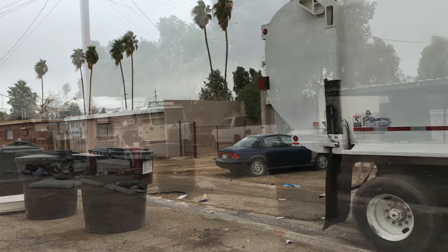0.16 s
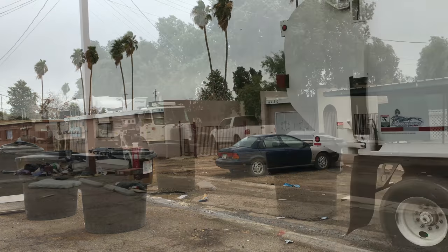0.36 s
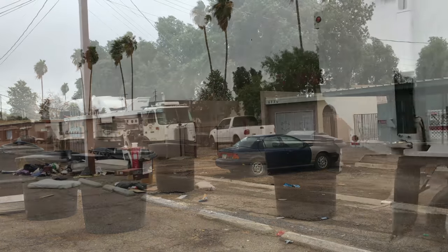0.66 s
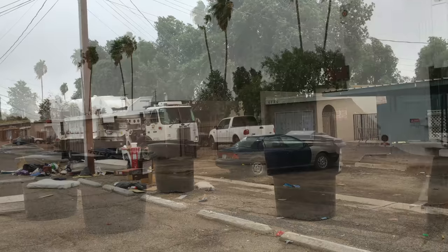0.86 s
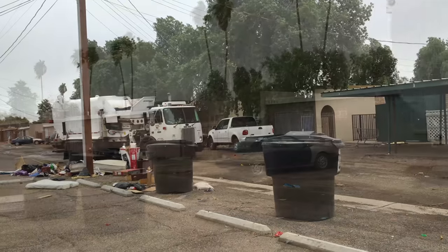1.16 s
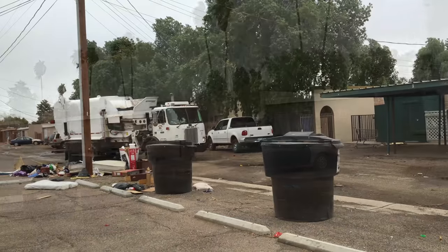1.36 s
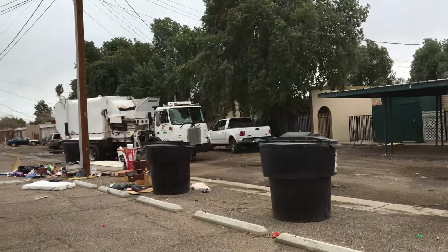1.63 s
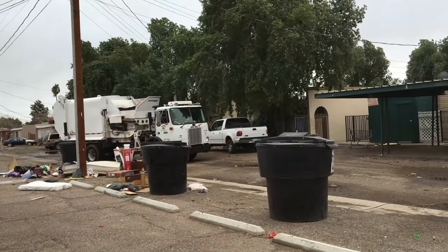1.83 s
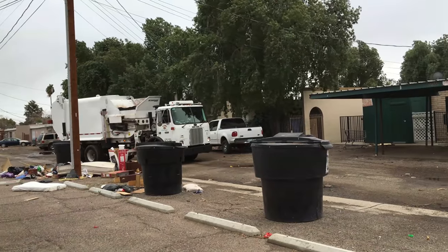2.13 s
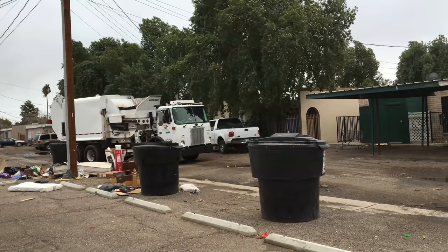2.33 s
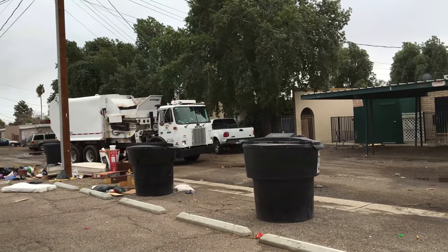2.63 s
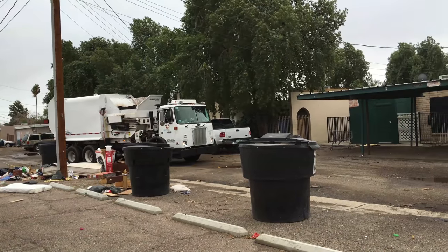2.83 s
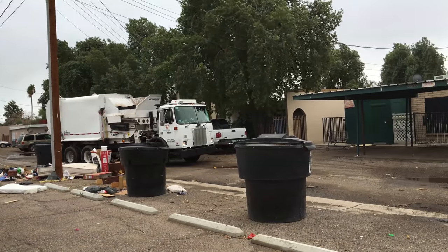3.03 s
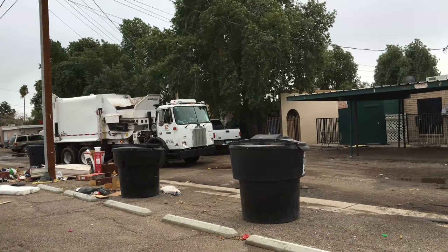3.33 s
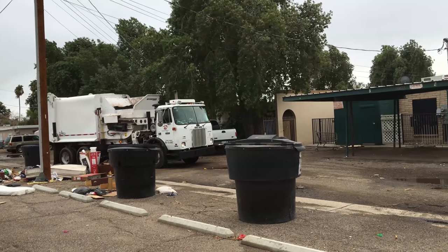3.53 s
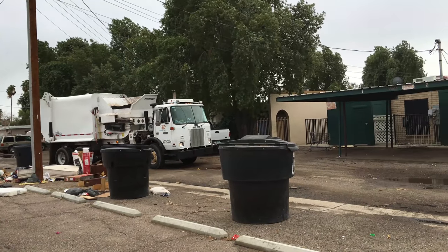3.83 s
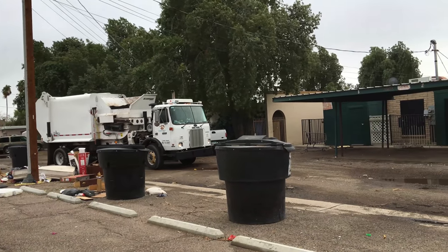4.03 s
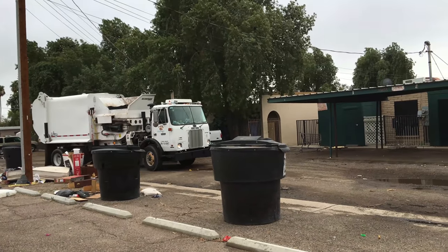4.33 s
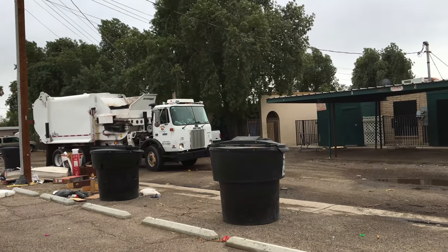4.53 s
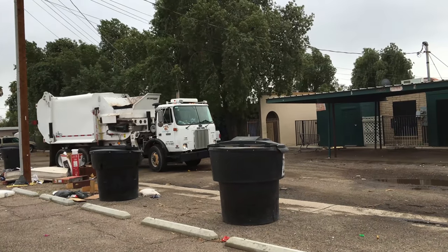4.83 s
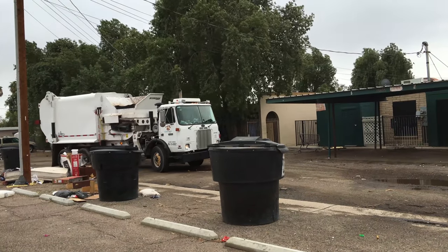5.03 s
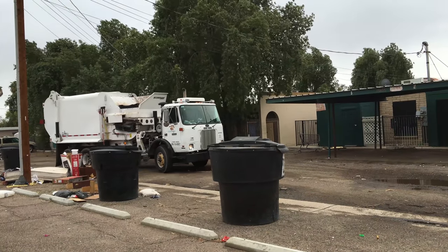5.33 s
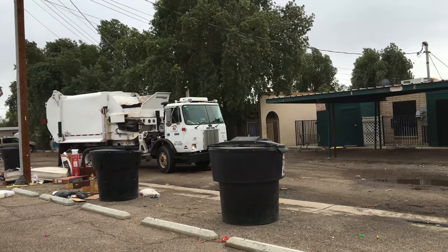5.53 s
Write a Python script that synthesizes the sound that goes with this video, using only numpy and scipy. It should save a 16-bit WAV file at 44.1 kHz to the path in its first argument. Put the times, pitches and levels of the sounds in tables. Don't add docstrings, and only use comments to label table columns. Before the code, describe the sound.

At 0 s a diesel refuse truck is close, with a strong low throb, rough clatter, whining gears and pumps, and a thin high brake squeak. Its revs and gear whine climb from about 0.4 s, and the exhaust fades by 1 s. From about 0.7 s gusty wind buffets a small bare microphone with irregular deep thumps, flapping slaps and fine crackle, heavy until about 3.4 s and sometimes overloading. Beneath it a second diesel across the open lot grows slowly, with faint whines, very high squeaks and tiny air puffs. From 3.43 to 4.14 s a loud, piercing, flickering brake squeal rings, sagging in pitch and ending in stutters. The wind slaps hard again from 4.1 to 4.5 s, then comes in sparser gusts. The far engine idles with buzzing panels; a sharp air puff comes at 5.47 s, and a last deep wind shove at 5.6 s.

```python
import sys
import numpy as np
from scipy import signal
from scipy.io import wavfile
from scipy.ndimage import uniform_filter1d, minimum_filter1d

SR = 44100
rng = np.random.default_rng(int(sys.argv[2]) if len(sys.argv) > 2 else 0)


def convert_level_to_amplitude(level_db):
    exponent = np.asarray(level_db, float) / 20
    return 10 ** exponent


def put_to_file(sound):
    columns = np.atleast_2d(sound).T
    safe = np.clip(columns, -1, 1)
    whole_steps = np.round(safe * 32767)
    wavfile.write(sys.argv[1], SR, whole_steps.astype(np.int16))


N = 250929

# time_s, firing_hz, level_db, second_order_db
NEAR_FIRING = [
    (0, 45, -13.5, -20),
    (.25, 45.37, -12, -23),
    (.45, 47.8, -16, -19),
    (.6, 50.8, -16.5, -23),
    (.75, 53.1, -15.5, -41),
    (.9, 57, -32, -30),
    (1.0, 55.7, -40, -40),
]
# time_s, firing_hz, level_db
FAR_FIRING = [
    (1.0, 45.8, -54),
    (2.5, 44.54, -39),
    (3.6, 43.95, -27),
    (4.2, 44.63, -21.5),
    (5.0, 43.1, -29.5),
    (5.69, 42.6, -23),
]


def evened(x):
    return x / np.sqrt(np.mean(x ** 2) + 1e-20)


def read(points, hz):
    f, value = np.transpose(points)
    return np.interp(np.log(hz + 1), np.log(f + 1), value)


def add(mix, s, sound):
    part = mix[max(round(s * SR), 0):][:len(sound)]
    part += sound[:len(part)]


def columns(rows):
    s, *rest = np.transpose(rows)
    t = np.arange(s[0], s[-1], 1 / SR)
    return s[0], *(np.interp(t, s, c) for c in rest)


def drift(n, seconds):
    size = max(round(seconds * SR), 2)
    return evened(uniform_filter1d(uniform_filter1d(rng.standard_normal(n), size), size))


def band(x, low_hz, high_hz, order=2):
    return signal.sosfilt(signal.butter(order, [low_hz, min(high_hz, SR * .49)], "band", fs=SR, output="sos"), x)


def line(start, length, from_hz, to_hz, db):
    swell, fade = 0.44, 0.33
    u = np.array([0, swell, 1 - fade, 1])
    swell_db = -2.5 * (start > 0)
    level_db = db + np.array([swell_db, 0, 0, -3.5])
    return np.transpose([start + length * u, from_hz + (to_hz - from_hz) * u, level_db])


def tone(rows, waver_hz, flutter_db, seconds):
    s, hz, level_db = columns(rows)
    turn = 2 * np.pi * np.cumsum(hz + waver_hz * drift(len(hz), seconds)) / SR
    tremble = convert_level_to_amplitude(level_db + flutter_db * drift(len(hz), seconds))
    return s, np.sqrt(2) * tremble * np.sin(turn) * signal.windows.tukey(len(hz), .1)


def bursts(rows, half_length_cycles, gain_db):
    out = np.zeros(N)
    for (s, db, hz), phase in zip(rows, rng.random(len(rows))):
        u = hz * np.arange(-.03, .03, 1 / SR)
        swell = np.exp(-(u / half_length_cycles) ** 2)
        add(out, s - .03, convert_level_to_amplitude(db + gain_db) * np.cos(2 * np.pi * (u + phase)) * swell)
    return out


def gusts():
    # start_s, length_s, strength_db, air_speed (0-1)
    gust_list = [(0.498, 0.3, -16, 0.4), (0.7, 0.19, -14.5, 0.42), (0.91, 0.2, -9.5, 0.34),
                 (1.09, 0.14, -11, 0.75), (1.239, 0.11, -7, 0.28), (1.348, 0.21, -13, 0.49),
                 (1.49, 0.1, -12.5, 0.48), (1.574, .1, -10, 0.6), (1.683, 0.23, -12.5, 0.37),
                 (1.83, 0.076, -7.5, 0.26), (1.891, 0.2, -8.5, 0.71), (2.173, 0.15, -14, 0.46),
                 (2.337, 0.08, -14, 0.84), (2.405, 0.17, -13, 0.2), (2.51, 0.087, -10.5, 0.6),
                 (2.666, 0.1, -12.5, 0.08), (2.796, 0.078, -9, 0.32), (2.916, 0.065, -11, 0.04),
                 (3.028, 0.2, -12, 0.4), (3.285, 0.14, -10.5, 0.88), (3.431, 0.034, -5.5, 0.4),
                 (3.53, 0.55, -24.5, 0.7), (3.97, 0.11, -12.5, 0.57), (4.077, 0.21, -10, 1),
                 (4.264, 0.13, -20.5, 0), (4.378, 0.18, -12, 0.79), (4.63, 0.043, -18, 0.75),
                 (4.93, 0.11, -14, 0.38), (5.043, 0.093, -11.5, 0.54), (5.12, 0.23, -19, 0.4)]
    slow_air_db = (1.5, -13, -23.5)
    fast_air_db = (-6.5, -3, -10.5)
    breeze_db = (-23, -37.5, -37.5)
    rise_s = (0.05, 0.037, 0.016)
    fall_s = (0.042, 0.032, 0.031)
    gust_sag_db = (-.5, -1, -1)
    calm_s, calm_db = 5.42, -4.5

    t = np.arange(0, N, 32) / SR
    rise, fall, sag_db = (np.array(v)[:, None] for v in (rise_s, fall_s, gust_sag_db))
    calm = convert_level_to_amplitude(calm_db * np.clip((t - calm_s) / .05, 0, 1))
    power = convert_level_to_amplitude(np.array(breeze_db))[:, None] ** 2 * np.minimum(t / .5, 1) ** 2 * calm ** 2
    for s, length, db, speed in gust_list:
        shape = np.clip(np.minimum((t - s) / rise + .5, (s + length - t) / fall + .5), 0, 1)
        share_db = np.add(slow_air_db, np.clip(speed, 0, 1) * np.subtract(fast_air_db, slow_air_db))[:, None]
        sagged_db = db + share_db + sag_db * np.clip((t - s) / length, 0, 1)
        power = power + convert_level_to_amplitude(sagged_db) ** 2 * shape ** 4
    return [np.interp(np.arange(N) / SR, t, 10 * np.log10(p + 1e-12)) for p in power]


def wind():
    # time_s, peak_db, pitch_hz
    slaps = [(0.717, -13, 590), (0.745, -8, 590), (0.999, -9, 527), (1.036, -10, 570), (1.047, -11, 830),
             (1.127, -10.3, 690), (1.146, -8, 960), (1.175, -5.5, 700), (1.263, -4, 547), (1.417, -9, 494),
             (1.5, -7.5, 597), (1.602, -13.4, 720), (1.62, -8, 607), (1.639, -7, 556), (1.654, -4.5, 626),
             (1.895, -8, 497), (1.908, -7, 513), (1.927, -9.9, 510), (1.939, -4, 670), (1.991, -7, 590),
             (2.009, -18, 606), (2.026, -17, 656), (2.045, -9, 580), (2.206, -4.5, 736), (2.216, -4.5, 490),
             (2.356, -4.5, 487), (2.368, -11, 520), (2.382, -7.5, 560), (2.563, -11, 550),
             (2.852, -12.7, 645), (3.187, -10.9, 587), (3.315, -15, 560), (3.341, -18, 670),
             (3.371, -7, 520), (3.384, -6, 550), (3.392, -10, 620), (4.106, -2.5, 574), (4.12, -7, 710),
             (4.128, -11, 690), (4.14, -9.4, 680), (4.151, -4.5, 540), (4.16, -11, 620), (4.169, -5, 760),
             (4.186, -14, 630), (4.194, -4, 600), (4.231, -4, 660), (4.252, -3, 680), (4.262, -8.5, 595),
             (4.404, -4.5, 583), (4.423, -8.5, 755), (4.437, -6, 577), (4.478, -11, 540),
             (4.511, -12.0, 590), (4.665, -16, 740), (5.009, -11, 510), (5.059, -14, 664),
             (5.073, -16, 640), (5.109, -12, 680), (5.485, -17, 850), (5.62, -10.5, 790)]
    # time_s, peak_db, pitch_hz
    thumps = [(0.747, -7.5, 240), (0.904, -12.6, 190), (0.974, -11.6, 203), (1.015, -16, 199),
              (1.105, -11, 218), (1.148, -8.3, 210), (1.169, -7.4, 188), (1.197, -15, 210),
              (1.272, -5, 180), (1.322, -7, 232), (1.418, -8, 267), (1.493, -9.2, 200), (1.602, -8, 197),
              (1.62, -7.5, 208), (1.771, -6, 180), (1.842, -11, 192), (1.863, -10, 190), (1.907, -10, 200),
              (1.926, -1, 234), (1.948, -10, 189), (1.997, -13, 270), (2.031, -9, 182), (2.051, -2, 197),
              (2.072, -13, 197), (2.142, -9.5, 188), (2.217, -8.9, 218), (2.262, -14, 191),
              (2.293, -13, 221), (2.371, -10.0, 270), (2.395, -11, 260), (2.452, -11, 180),
              (2.518, -11, 202), (2.565, -3, 232), (2.695, -16, 200), (2.833, -7, 193), (2.852, -5, 190),
              (3.134, -11.1, 196), (3.188, -2.5, 210), (3.296, -9, 220), (3.34, -2.5, 222), (3.396, 3, 223),
              (3.445, -21, 240), (4.017, -7.5, 241), (4.096, -7.5, 200), (4.122, -2.1, 242),
              (4.153, 1.5, 194), (4.199, 0, 228), (4.228, -13, 252), (4.26, -4.5, 201), (4.403, -3, 214),
              (4.438, -3.5, 270), (4.466, -7, 212), (4.51, -9.3, 191), (4.534, -10.0, 190),
              (4.653, -11, 189), (4.983, -7.5, 182), (5.01, -6, 220), (5.064, -9, 210), (5.111, -7.5, 207),
              (5.154, -9, 220)]
    # low_hz, high_hz
    eddy_sizes = [
        (40, 136),
        (125, 331),
        (340, 755),
    ]

    out = bursts(slaps, 0.75, -0.5) + bursts(thumps, 0.91, -1.5)
    clumps = np.clip(drift(N, 0.0029), -2, 2)
    for (low, high), level_db, clump_db, steady_s in zip(eddy_sizes, gusts(), (1.5, 2.2, 3.), (.06, .04, .03)):
        eddies = band(rng.standard_normal(N), low, high, order=3) * convert_level_to_amplitude(clump_db * clumps)
        size = round(steady_s * SR)
        power = uniform_filter1d(uniform_filter1d(eddies ** 2, size), size)
        out += convert_level_to_amplitude(level_db - 1.0) * eddies / np.sqrt(abs(power) + 1e-9)
    return out


def shoves():
    # time_s, peak_db, pitch_hz
    shove_list = [(0.927, -8, 123), (1.03, -0.5, 118), (1.206, -5, 69), (1.571, -4.5, 82), (1.832, -6, 88),
                  (2.134, -6.5, 71.5), (2.386, -4, 88), (2.665, -5.5, 94), (2.7, -6, 69.6),
                  (2.815, 1.5, 87.5), (2.932, -6.5, 50), (3.166, 1.5, 74), (3.226, -8, 64.4),
                  (3.4, -11, 72), (3.525, -9, 93), (4.4, -9, 141), (4.236, -3, 118), (4.495, -4.5, 114),
                  (4.815, -3.5, 73.4), (5.327, -6, 83), (5.515, -5.5, 53), (5.616, 4.5, 47)]
    out = np.zeros(N)
    for s, db, hz in shove_list:
        u = hz * np.arange(SR // 8) / SR
        add(out, s, convert_level_to_amplitude(db - 11.5) * np.sin(2 * np.pi * u) * 2.26 * u * np.exp(-(u / 2.16) ** 2))
    return out


def crackle():
    # time_s, peak_db, pitch_hz
    cracks = [(1.0457, -15, 982), (1.1154, -19, 1020), (1.1444, -12, 1040), (1.1733, -20, 1020),
              (1.4965, -23, 1160), (1.5394, -16, 993), (1.5988, -25, 1080), (1.618, -9, 1040),
              (1.6534, -18, 1070), (1.8303, -25, 996), (1.9375, -12, 1040), (1.9694, -21, 1010),
              (1.989, -19, 988), (2.0104, -11, 996), (2.2048, -10, 970), (2.4543, -24, 1030),
              (2.5192, -27, 1100), (2.815, -16, 1090), (2.9243, -20, 1150), (2.9637, -20, 1070),
              (3.1854, -18, 993), (3.3917, -10, 1010),
              (4.119, -20, 1120), (4.171, -14, 1160), (4.1932, -18, 1090), (4.2471, -19, 1000),
                   (4.4217, -16, 1020), (4.466, -25, 1160), (4.6297, -21, 1210), (4.7055, -25, 1300),
                   (5.0473, -22, 1120), (5.174, -22, 1190)]

    snaps = (rng.random(N) < 220. / SR) * rng.standard_normal(N)
    fizz = rng.standard_normal(N) * convert_level_to_amplitude(3.3 * np.clip(drift(N, 0.0022), -2, 2))
    rustle = convert_level_to_amplitude(-8.5) * evened(band(snaps, 417, 1180, order=3))
    rustle = rustle + convert_level_to_amplitude(-13.5) * evened(band(fizz, 810, 1420))
    return convert_level_to_amplitude(gusts()[2]) * rustle + bursts(cracks, 1.5, -5.5)


def clatter():
    # time_s, level_db, nearness (0-1)
    roar_levels = [(0, -24.5, 0.72), (.25, -27, 0.97), (.6, -28.5, 0.82), (1.08, -33.5, 0.54),
                   (1.27, -37.5, 0.74), (1.52, -38.5, 0), (1.71, -33.5, 0.33), (2.171, -38, 0.18),
                   (3.04, -34, 0.27), (3.52, -35.5, 0.26), (3.8, -31, 0.94), (3.95, -31, 0.6),
                   (4.14, -35.5, 0.11), (4.388, -35.5, 0.2), (4.9, -32.5, 0.3), (5.279, -33, 0.42),
                   (5.69, -28.5, 0.44)]
    # pitch_hz, density_db (per Hz)
    near_colour = [(60, -29), (100, -4), (160, -12), (330, -13), (700, -18), (1100, -18), (1500, -18),
                   (2300, -20), (2900, -25), (4500, -24), (5000, -35.5), (7700, -35), (10300, -37),
                   (15800, -45)]
    # pitch_hz, density_db (per Hz)
    far_colour = [(60, -23), (100, -16), (170, -9), (370, -20.5), (645, -9), (800, -49), (1030, -16.5),
                  (2250, -20.5), (2840, -28), (4400, -28), (4950, -42), (9000, -43), (11300, -51.5),
                  (15800, -56)]
    # pitch_hz, width_hz, boost_db
    panels = [(1100, 206, -8.5), (1600, 53, -22), (4300, 3100, -47), (6000, 1020, 2.5)]

    frames, hz = N // 128 + 5, np.fft.rfftfreq(512, 1 / SR)
    a, b, patches = rng.standard_normal((frames, 257, 3)).T
    patches = evened(uniform_filter1d(uniform_filter1d(patches, 6, 0), 20, 1))
    s, level_db, near = np.transpose(roar_levels)
    t = np.arange(frames) * 128 / SR
    near = np.clip(np.interp(t, s, near), 0, 1)
    colour = convert_level_to_amplitude(read(near_colour, hz)[:, None] * near + read(far_colour, hz)[:, None] * (1 - near))
    reference = (hz > 2500) & (hz < 4400)
    colour = colour / np.sqrt((colour[reference] ** 2).sum(0))
    for f, width, db in panels:
        colour = colour * (1 + convert_level_to_amplitude(db + 1.5) / (1 + (2 * (hz - f) / width) ** 2))[:, None]
    strength = convert_level_to_amplitude(np.interp(t, s, level_db) + 1.38 * patches + 0.54 * drift(frames, 3e-4))
    z = (a + 1j * b) * colour * strength
    roar = 3.88 * signal.istft(z, nperseg=512, noverlap=384)[1][:N] / np.sqrt(512) * 4
    firing = np.interp(np.arange(N) / SR, *np.transpose(NEAR_FIRING)[:2]) * (np.arange(N) < SR)
    turns = np.cumsum(np.where(firing > 0, firing, FAR_FIRING[2][1])) / SR
    return roar * (1 + 0.11 * np.exp(-(turns % 1) / 0.089))


def exhausts():
    # multiple, level_db
    far_orders = [(1, 1), (2, -2.5), (3, -14)]
    out = np.zeros(N)
    s, hz, first_db, second_db = columns(NEAR_FIRING)
    turn = 2 * np.pi * np.cumsum(hz) / SR
    near = convert_level_to_amplitude(first_db) * np.sin(turn)
    near = near + convert_level_to_amplitude(second_db) * (np.sin(2 * turn + 3.1) + 0.23 * np.sin(4 * turn + 0.55))
    add(out, s, np.sqrt(2) * near * np.minimum(np.arange(len(hz))[::-1] / (.15 * SR), 1))
    s, hz, level_db = columns(FAR_FIRING)
    turn = 2 * np.pi * np.cumsum(hz * (1 + 0.01 * drift(len(hz), 0.058))) / SR
    far = sum(convert_level_to_amplitude(db) * np.sin(k * turn + k * k) for k, db in far_orders)
    add(out, s, np.sqrt(2) * convert_level_to_amplitude(level_db) * far * np.minimum(np.arange(len(hz)) / (.3 * SR), 1))
    return out


def gears():
    # time_s, mesh_hz
    mesh = [(0, 568), (.38, 570), (.45, 592), (.6, 642), (.68, 658), (.8, 679), (1.02, 696), (1.15, 697),
            (1.42, 675)]
    # start_s, length_s, multiple, level_db
    gear_lines = [(0, .88, 2, -33.5), (.12, .29, 3, -29), (.36, .22, 2, -31), (0, .44, 4, -36),
                  (.6, .14, 3, -33), (.72, .36, 3, -35.5), (1.08, .3, 3, -35.5)]
    out = np.zeros(N)
    for start, length, k, db in gear_lines:
        t = np.linspace(start, start + length, num=12)
        s, _, level_db = line(start, length, 0, 0, db).T
        rows = np.transpose([t, k * np.interp(t, *np.transpose(mesh)), np.interp(t, s, level_db)])
        add(out, *tone(rows, waver_hz=4.3, flutter_db=2.0, seconds=0.013))
    return out


def whines():
    # start_s, length_s, from_hz, to_hz, level_db
    whine_lines = [(0, .54, 4510, 4510, -41), (.54, .1, 4510, 4505, -38), (.62, .18, 3235, 3240, -40),
                   (.84, .2, 4175, 4175, -43), (0, .44, 6230, 6500, -44), (.4, .32, 6470, 7070, -45),
                   (1.85, 1.85, 6460, 5950, -56), (3.6, 1.8, 5980, 5850, -54), (2.3, 1.45, 1620, 1590, -41)]
    out = np.zeros(N)
    for row in whine_lines:
        add(out, *tone(line(*row), waver_hz=9.5, flutter_db=4.5, seconds=0.0059))
    return out


def buzzes():
    # start_s, length_s, from_hz, to_hz, level_db
    buzz_lines = [(0, .22, 1046, 1056, -32), (.18, .24, 1056, 1100, -39), (1.55, .35, 1060, 1040, -41),
                  (4.45, .65, 1130, 1085, -36), (5.0, .75, 1080, 1100, -33), (4.6, 1.15, 935, 890, -38),
                  (.65, .09, 1215, 1225, -34), (5.5, .19, 330, 335, -30), (4.5, .9, 4160, 4140, -47),
                  (2.3, 1.9, 650, 666, -43), (4.1, 1.65, 668, 664, -40)]
    out = np.zeros(N)
    for row in buzz_lines:
        add(out, *tone(line(*row), waver_hz=51.5, flutter_db=2.5, seconds=0.00547))
    return out


def puffs():
    # time_s, peak_db, t60_s, low_hz, high_hz
    jets = [(1.145, -21, 0.078, 850, 1600), (1.49, -42, 0.98, 2500, 9500), (1.654, -33.5, .35, 1460, 8800),
            (2.203, -20.5, 0.027, 900, 2560), (1.937, -24, .03, 1200, 2400), (2.615, -40, .06, 6200, 7300),
            (5.426, -41, 0.11, 5070, 10700), (5.47, -23, 0.16, 2550, 3870), (5.473, -20, 0.093, 900, 2620),
            (5.474, -30.5, 0.14, 5970, 8400), (5.599, -37, 0.46, 4300, 7400)]
    out, t = np.zeros(N), np.arange(SR // 2) / SR
    for s, db, t60, low_hz, high_hz in jets:
        jet = evened(band(rng.standard_normal(len(t)), low_hz, high_hz))
        add(out, s, jet * convert_level_to_amplitude(db - 60 * t / t60) * np.minimum(t / (0.015 * t60), 1))
    return out


def squeaks():
    # start_s, length_s, from_hz, to_hz, level_db
    squeak_lines = [(0, .3, 10205, 10190, -31), (.25, .135, 10170, 10140, -36),
                    (.39, .05, 10150, 10140, -43), (.085, .145, 9600, 9580, -43),
                    (.315, .085, 7930, 7900, -39), (.28, .05, 8180, 7920, -41), (.5, .2, 7900, 7930, -45),
                    (.87, .045, 7930, 7910, -49), (.935, .11, 7900, 7950, -45),
                    (1.06, .085, 7970, 8100, -45), (1.14, .13, 8280, 8500, -50),
                    (.855, .05, 9500, 9230, -43), (.885, .085, 9235, 9200, -35),
                    (.95, .075, 9220, 9260, -39), (1.025, .11, 9250, 9300, -45),
                    (1.36, .3, 8255, 8280, -56), (1.8, .3, 8290, 8330, -58), (2.04, .18, 8330, 8480, -54),
                    (.1, .4, 14920, 14920, -61), (1.4, .35, 14680, 14630, -65),
                    (1.76, .53, 13480, 14150, -63), (2.08, .1, 12150, 12170, -60),
                    (2.385, .64, 14960, 14810, -48), (2.95, .2, 14800, 14840, -45),
                    (3.1, .38, 14830, 15040, -50), (3.34, .16, 14180, 14050, -55),
                    (4.17, .3, 15470, 15380, -62), (4.45, .63, 15300, 15250, -56),
                    (4.68, .1, 11110, 11140, -57), (5.36, .28, 15070, 15030, -58)]
    # start_s, length_s, from_hz, to_hz, level_db
    last_squeak = (3.5, .14, 14950, 14750, -48)
    out = np.zeros(N)
    for row in squeak_lines + [last_squeak]:
        high = row[2] > 13000
        waver_hz, seconds = (45., .003) if high else (20., .004)
        add(out, *tone(line(*row), waver_hz, flutter_db=3.0, seconds=seconds))
    return out


def squeal():
    # time_s, pitch_hz, level_db
    glide = [
        (3.43, 1167, -35),
        (3.465, 1173, -17),
        (3.525, 1170, -13),
        (3.6, 1173, -16.5),
        (3.74, 1166, -15),
        (3.885, 1170, -16.5),
        (3.935, 1139, -13.5),
        (4.1, 1100, -21),
        (4.138, 1100, -22),
    ]
    # multiple, level_db
    overtones = [(1, 5), (2, -14), (3, -20), (4, -25.5), (5, -29), (6, -24.5), (7, -29), (8, -33), (9, -50),
                 (10, -41), (11, -40), (12, -42), (13, -44)]
    # time_s, length_s, depth_db
    skips = [(3.634, 0.039, 7.5), (3.705, 0.017, 23), (3.784, 0.026, 9), (3.902, 0.0067, 20),
             (3.927, 0.0058, 14), (3.963, 0.01, 16), (4.013, 0.017, 6), (4.04, 0.0077, 7),
             (4.11, 0.0037, 4)]
    # time_s, level_db
    scrape = [
        (3.43, -57),
        (3.6, -50),
        (3.8, -46.5),
        (3.93, -51),
        (4.03, -64),
    ]
    dull_from_s, dull_db_per_s = 3.8, 19
    slack_from_s, slack_db_per_s = 4.035, 250

    out = np.zeros(N)
    s, hz, level_db = columns(glide)
    n = len(hz)
    overtone_db = -14.5 + 0.51 * level_db + 11 * np.arange(n) / SR
    t = s + np.arange(n) / SR
    skip_db = sum(db * np.exp(-((t - at) / length) ** 2) for at, length, db in skips)
    level_db = level_db - skip_db
    overtone_db = overtone_db - 0.22 * skip_db - slack_db_per_s * np.maximum(t - slack_from_s, 0)
    dull_db = dull_db_per_s * np.maximum(t - dull_from_s, 0)
    turn = 2 * np.pi * np.cumsum(hz + 7.2 * drift(n, 0.0022) + 5.0 * drift(n, .015)) / SR
    stack = convert_level_to_amplitude(level_db + 0.75 * drift(n, 0.0046)) * np.sin(turn)
    for k, db in overtones[1:]:
        flicker_db = np.clip(5.6 * drift(n, 0.011), -9, 3.5)
        stack += convert_level_to_amplitude(db + overtone_db - (k - 1.1) * dull_db + flicker_db) * np.sin(k * turn)
    add(out, s, np.sqrt(2) * stack * signal.windows.tukey(n, .03))
    s, hiss_db = columns(scrape)
    hiss = evened(band(rng.standard_normal(len(hiss_db)), 2500, 14000, order=1))
    add(out, s, convert_level_to_amplitude(hiss_db) * hiss)
    return out


def scene():
    air = wind() + shoves() + crackle()
    engines = clatter() + exhausts() + gears() + whines() + buzzes()
    brakes = puffs() + squeaks() + squeal()
    return (air + engines + brakes)[None]


def thinned_treble(x):
    from_hz, reach_hz, under_db = 9400, 2400, -20
    hz, _, z = signal.stft(x, SR, nperseg=1024)
    treble = (hz > from_hz)[:, None]
    power = uniform_filter1d(abs(z) ** 2, size=5, axis=1) * treble
    loudest = -minimum_filter1d(-power, size=round(2 * reach_hz / hz[1]), axis=1)
    near = uniform_filter1d(abs(z) ** 2, size=17, axis=1)
    faint = (near < loudest * convert_level_to_amplitude(under_db) ** 2) & treble
    return signal.istft(z * np.where(faint, .03, 1), SR, nperseg=1024)[1][:, :N]


def low_pass(x):
    return signal.sosfilt(signal.butter(12, 15960, fs=SR, output="sos"), x)


def record(dry):
    cut = signal.sosfilt(signal.butter(4, 40.2, "high", fs=SR, output="sos"), dry)
    limited = cut / (1 + abs(cut) ** 8) ** (1 / 8)
    edge = signal.firwin(1023, 15780, window=("kaiser", 9), fs=SR)
    mix = signal.oaconvolve(thinned_treble(limited), edge[None], "same")
    return low_pass(mix)


dry = scene()
out = record(dry)
put_to_file(out)
```